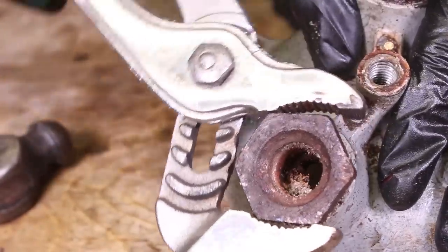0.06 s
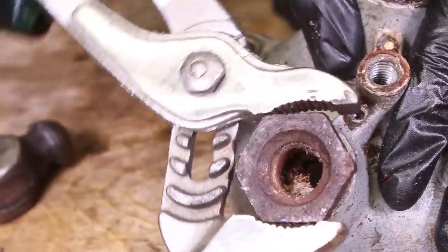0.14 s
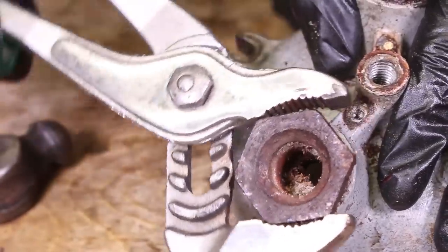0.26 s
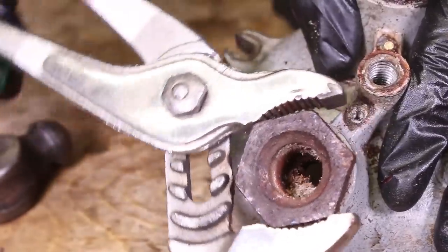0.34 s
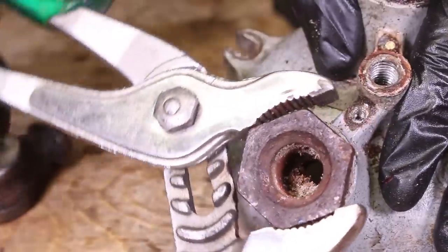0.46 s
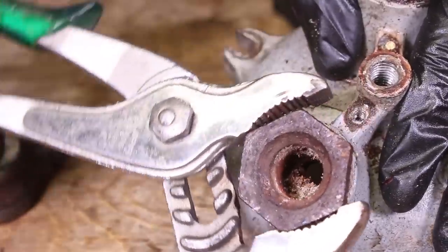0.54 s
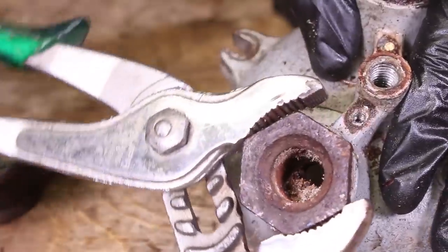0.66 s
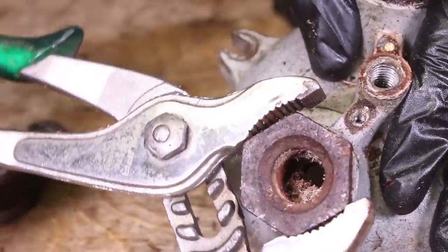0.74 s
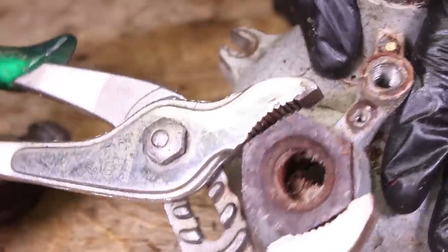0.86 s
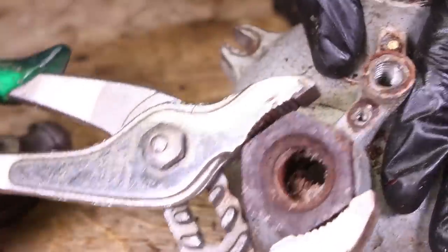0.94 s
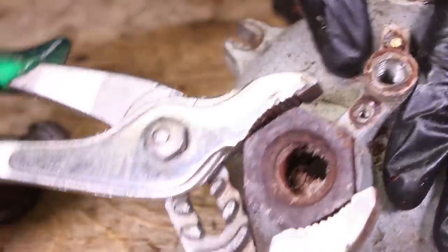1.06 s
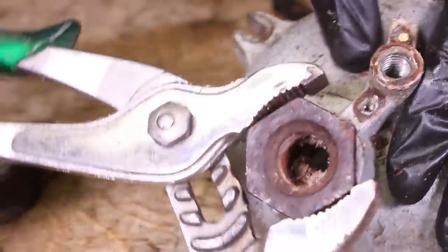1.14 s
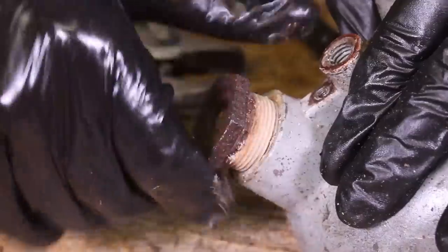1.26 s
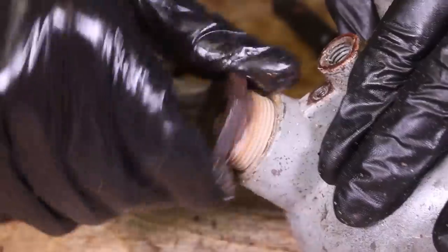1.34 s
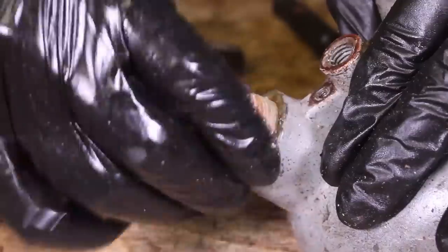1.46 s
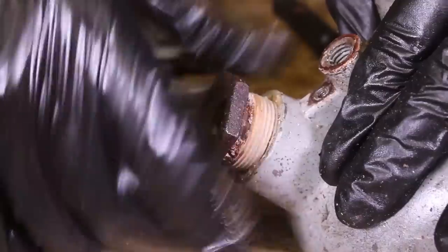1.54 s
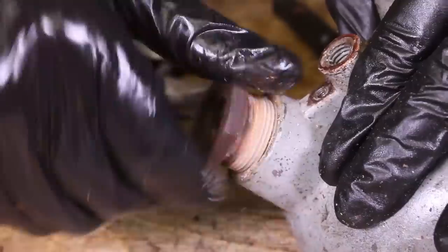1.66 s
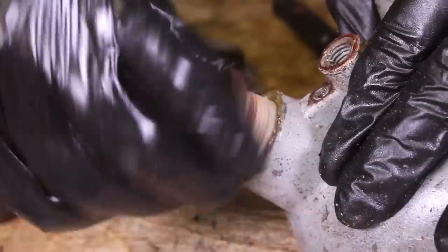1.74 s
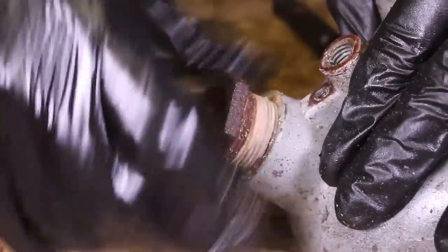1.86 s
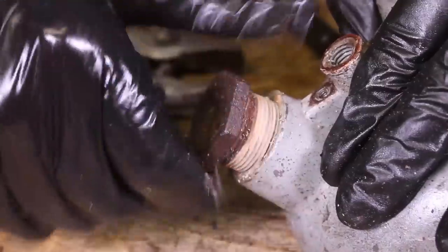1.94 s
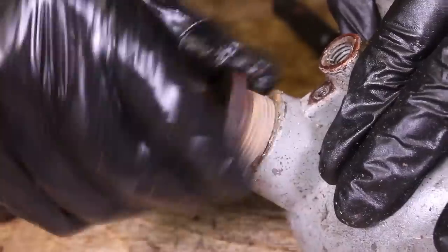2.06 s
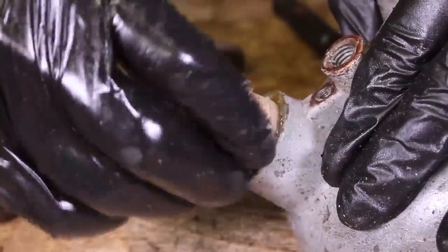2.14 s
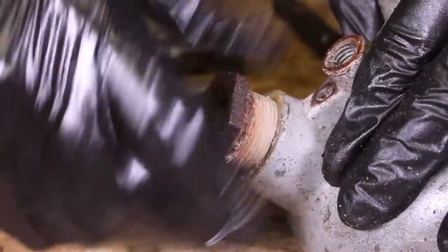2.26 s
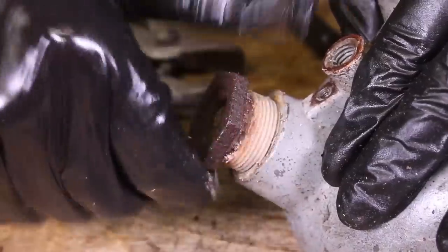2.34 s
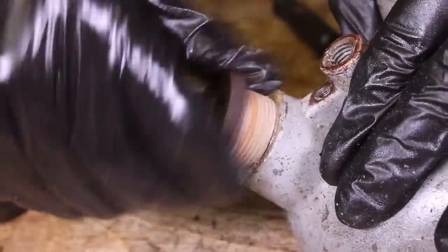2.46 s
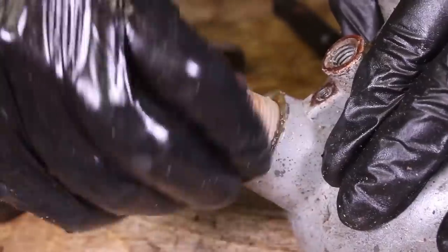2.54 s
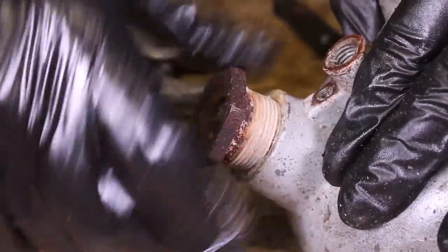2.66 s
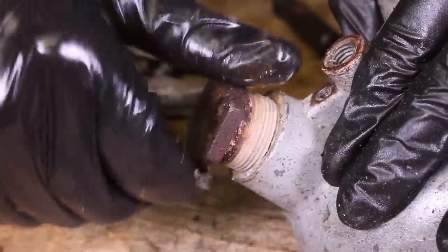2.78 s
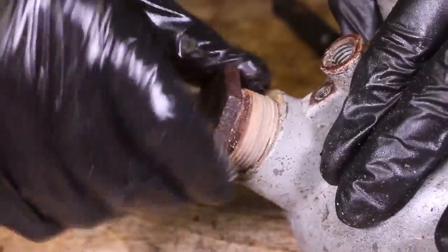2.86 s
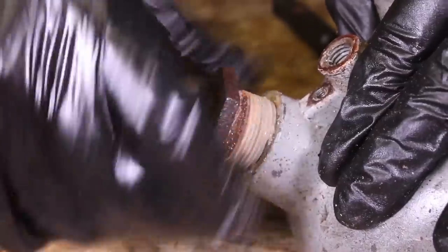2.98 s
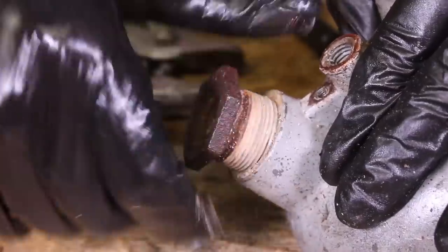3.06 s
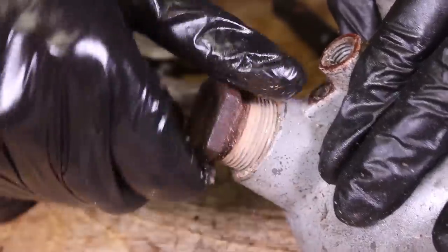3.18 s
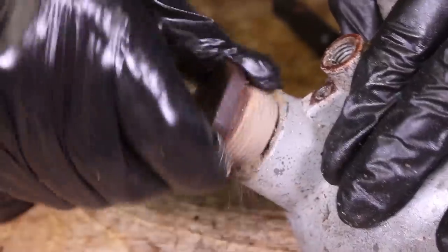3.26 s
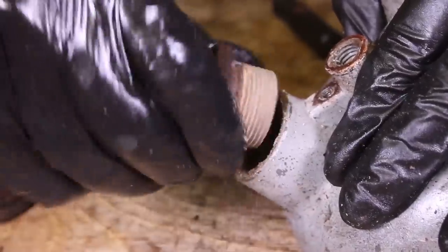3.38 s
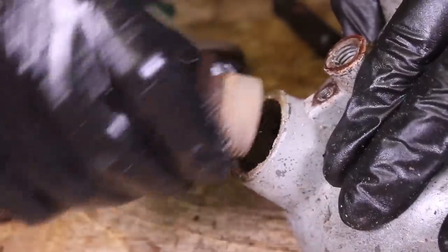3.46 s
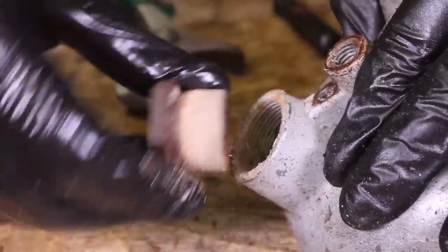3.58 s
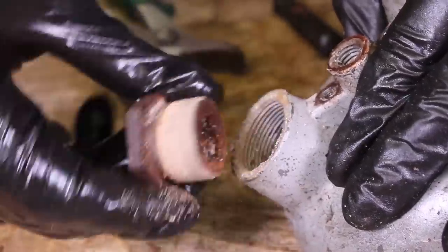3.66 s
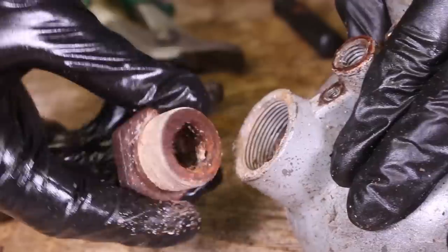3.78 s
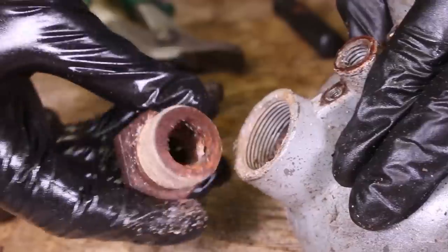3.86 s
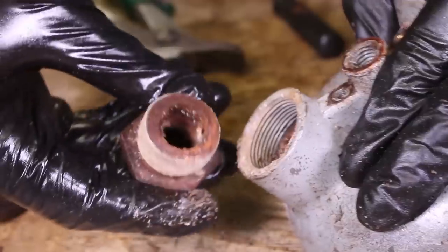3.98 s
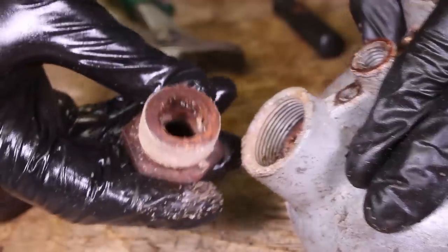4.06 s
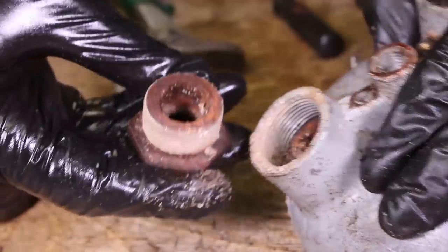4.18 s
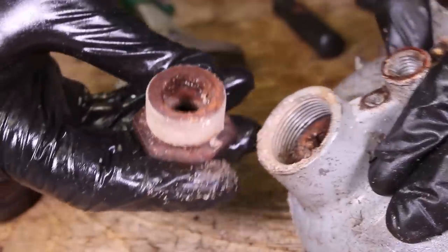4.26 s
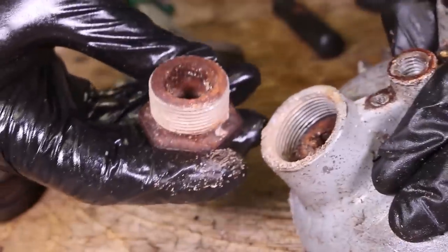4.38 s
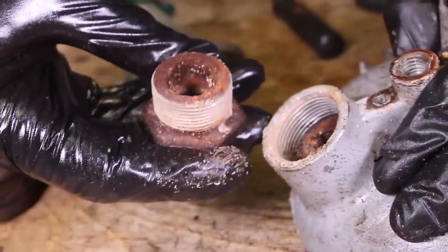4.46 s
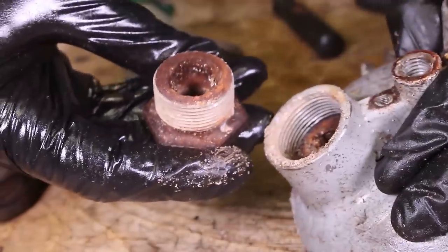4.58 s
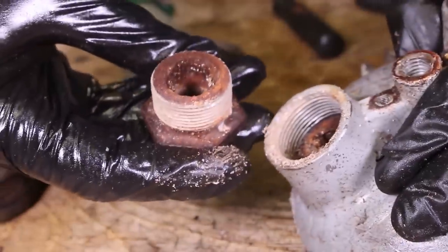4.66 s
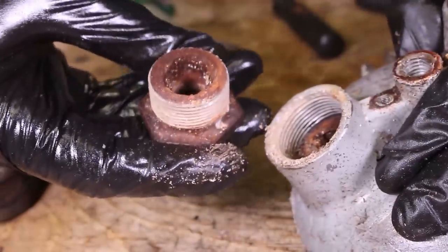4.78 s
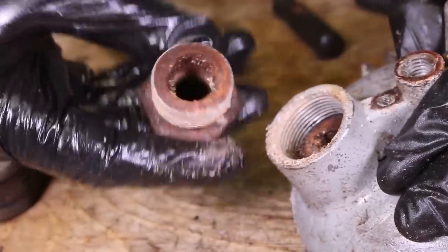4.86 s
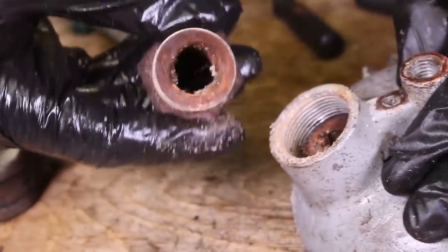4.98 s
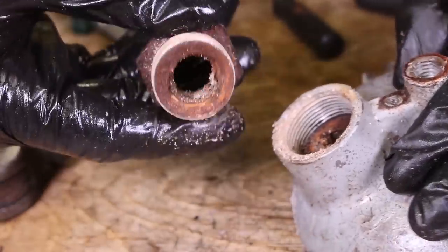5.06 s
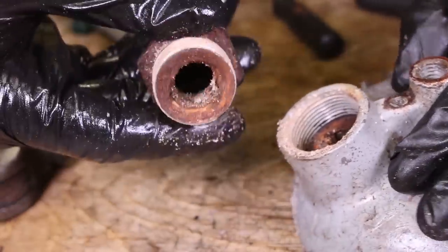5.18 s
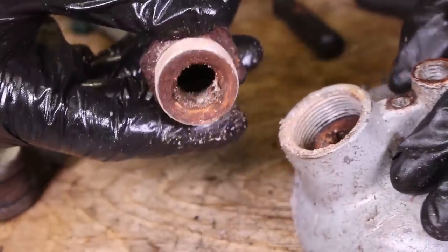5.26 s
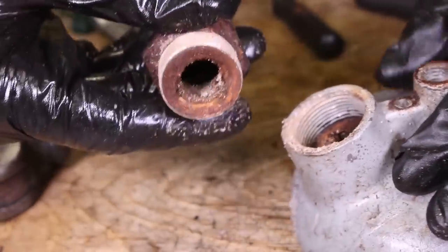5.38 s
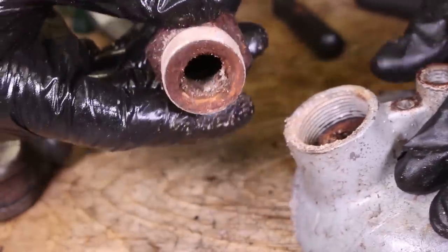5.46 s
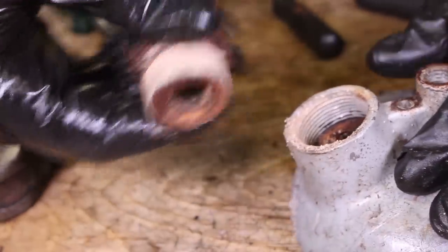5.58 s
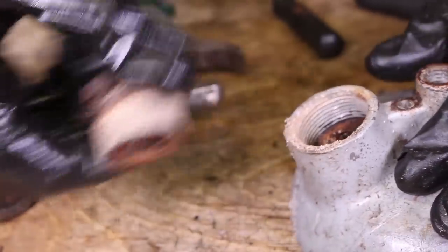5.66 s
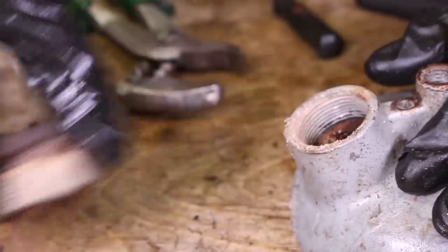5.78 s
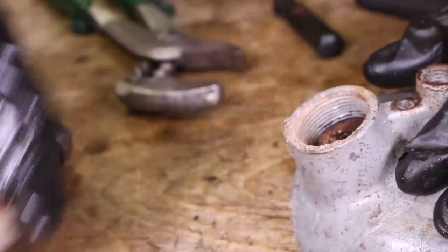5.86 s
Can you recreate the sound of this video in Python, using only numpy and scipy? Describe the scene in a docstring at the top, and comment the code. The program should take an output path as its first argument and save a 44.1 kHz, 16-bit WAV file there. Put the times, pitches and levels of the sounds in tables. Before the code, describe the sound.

One close microphone at a wooden bench in a small dry room. A seized nut creeps faintly with dull rumble, the casting bumps the wood, and rubber-gloved fingers spin the nut in short, uneven stick-slip rasps with clunks. It comes free with a hard clack. Afterwards only faint finger rustles, two small clusters of wood-and-metal taps, and a thin room hush remain.

```python
"""A rusted nut is eased by pliers in a cast lamp housing on a wooden bench, then spun out by gloved fingers in six twists.
Stick-slip grains in the thread rasp through the ringing housing and nut; short blows make the knocks of nut and housing.
Crinkling grains of noise make the rubber glove swish with the twists, between grips and under the fingertips.
Ticks, thumps and a low sway surround the work; then the freed nut is turned in the fingers
while the housing taps down on the bench. Small dry workshop, one close microphone."""
import sys
import numpy as np
from scipy import signal
from scipy.fft import rfft, irfft
from scipy.io import wavfile

SR = 44100
rng = np.random.default_rng(int(sys.argv[2]) if len(sys.argv) > 2 else 0)


def wav_out(sig):
    """Save sig, one row per channel (or a flat mono array), as 16-bit PCM at SR to the path in sys.argv[1]."""
    wavfile.write(sys.argv[1], SR, np.round(np.clip(np.atleast_2d(sig).T, -1, 1) * 32767).astype(np.int16))


N = 261072

# Levels in the tables are those going into each source's own mix trims and the room.
# twists of the nut: grip_s, fastest_s, let_go_s, rasp_db, sharp_rasp_db (relative), nut_ring_db, swish_db
NUT_TWISTS = [(1.413, 1.491, 1.568, -26.5, -6.5, -39, -42), (1.742, 1.835, 1.849, -18.5, -12, -38.5, -42.5),
              (2.078, 2.171, 2.22, -23.5, -9, -34.5, -50), (2.47, 2.555, 2.623, -23, -11.5, -35.5, -45),
              (2.887, 2.926, 2.943, -16, -9.5, -37, -55), (3.3, 3.319, 3.352, -18.5, -12.5, -28.5, -45)]
# the jaws turn the nut: time_s, thread_hiss_db, housing_groan_db
PLIERS_TURN = [(0.0, -69.5, -75), (0.25, -66, -70.5), (0.62, -71.5, -72.5), (0.9, -72, -67.5)]
# the nut knocks in its loose thread; at 1.058 s the housing cracks against the bench:
# start_s, level_db, contact_brightness_hz, grit (amplitude ratio), nut_ring_db (relative to level_db)
HOUSING_KNOCKS = [(.735, -53.5, 600, 0.36, -35), (1.0584, -27, 2640, 0.21, -46),
                  (1.393, -41.5, 1150, 0.095, -24), (1.421, -29, 2500, 0.27, -24),
                  (1.734, -22, 1650, 0.023, -30), (1.8039, -21, 1460, 0.0097, -30),
                  (1.828, -22, 1490, 0.018, -16), (2.068, -32.5, 1290, 0.32, -35),
                  (2.084, -34.5, 1300, 0.21, -35), (2.136, -26.5, 2410, .12, -14),
                  (2.155, -22.5, 2050, 0.45, -16), (2.431, -51.5, 800, 0.15, -33.5),
                  (2.4733, -19, 3200, 0.17, -12.5), (2.558, -17, 1560, 0.021, -22),
                  (2.675, -47.5, 1100, 0.13, -28), (2.705, -46, 1100, 0.11, -22),
                  (2.866, -32, 1190, 0.055, -49.5), (2.896, -20, 1200, 0.066, -29),
                  (2.910, -21.5, 2800, 0.13, -6), (2.998, -39, 898, 0.076, -24.5),
                  (3.3055, -10, 3200, 0.036, -23.5)]
# rust crumbs crack and the glove snaps: start_s, level_db, decay_s
CRUMB_TICKS = [(0.611, -60, 0.0027), (0.745, -66, 0.0054), (0.865, -48.5, 0.0074), (0.972, -45, 0.0035),
               (1.131, -49.5, 0.0036), (1.191, -45.5, 0.023), (1.685, -48.5, 0.0068), (2.343, -54, 0.0022),
               (3.222, -44.5, 0.0037), (3.247, -58.5, 0.0026), (3.671, -55.5, 0.0023),
               (5.022, -42.5, 0.0012), (5.29, -54, 0.0034), (5.379, -54, 0.0024)]
# weight lands on the bench top: start_s, level_db, contact_brightness_hz, grit (amplitude ratio)
BENCH_THUMPS = [(1.0578, -16.5, 1097, 0.02), (1.157, -37, 58.7, 0.023), (3.309, -24.5, 300, 0.022),
                (5.544, -26, 291.3, 0.022), (5.561, -37, 158, 0.0204), (5.580, -29.5, 109, 0.015)]
# casting and tools tap on the bench: start_s, wood_knock_db, metal_clink_db, contact_brightness_hz
BENCH_TAPS = [(4.026, -63.5, -63, 3000), (4.1562, -35.5, -37, 13700), (4.166, -25.5, -34.5, 4900),
              (4.175, -28.5, -34, 9730), (5.153, -56, -66.5, 5080), (5.239, -69, -67, 4130),
              (5.415, -40, -59, 5070), (5.428, -31, -46.5, 4610), (5.4563, -38, -47.5, 5000),
              (5.5054, -29, -32.5, 14100), (5.534, -36.5, -35, 12000), (5.541, -31, -42.5, 12050),
              (5.5731, -36.5, -30.5, 5300)]
# the casting drags on the bench between its taps, then lets off: time_s, level_db
HOUSING_DRAG = [(5.395, -62), (5.42, -52), (5.48, -52), (5.53, -44), (5.58, -64)]
# the load on the pliers sways the bench: time_s, level_db
PLIERS_SWAY = [(0.0, -40.5), (0.42, -38.5), (0.6, -42.5), (0.73, -30.5), (0.86, -31), (0.96, -46.5),
               (1.06, -41)]
# each push of the hands sets the bench rocking: start_s, level_db, decay_s
HAND_PUSHES = [(1.05, -24, .085), (1.394, -32, .055), (1.72, -29, .045), (2.06, -28.5, .055),
               (2.471, -30.5, .06), (2.89, -31, 0.11), (3.30, -23.5, .085), (5.541, -24, .08)]
# fingertips shift their hold on the parts: loudest_s, length_s, swish_db, dull_rub_db
FINGER_SHIFTS = [(0.75, 0.056, -57.5, -57), (0.988, 0.11, -53, -51), (1.049, 0.13, -52.5, -48.5),
                 (1.21, 0.17, -42.5, -92), (1.278, 0.096, -62, -54.5), (3.84, 0.09, -65, -72.5),
                 (4.019, 0.15, -57, -71), (4.34, 0.15, -54, -68.5), (4.471, .07, -80, -67),
                 (4.925, 0.16, -39.5, -55), (5.086, .18, -50.5, -57.5), (5.169, 0.14, -51.5, -59),
                 (5.24, 0.033, -56, -50.5), (5.363, 0.26, -64, -65), (5.772, .12, -54.5, -73.5)]
# the glove slides over the metal between grips: loudest_s, length_s, level_db, fold_pitch_hz
GLOVE_SLIDES = [(1.37, 0.13, -59, 8500), (1.602, 0.097, -53.5, 6710), (1.73, 0.14, -54.5, 8400),
                (1.925, 0.15, -61, 5510), (2.05, 0.088, -63, 8350), (2.305, 0.15, -54.5, 5470),
                (2.435, 0.042, -57.5, 7600), (2.71, 0.11, -58.5, 8950), (2.836, 0.039, -54.5, 7600),
                (2.96, 0.24, -58.5, 13100), (3.022, 0.082, -39.5, 8300), (3.245, 0.19, -59, 13070),
                (3.352, .045, -48.5, 8400), (5.08, 0.72, -63, 8550)]
# faint rustle of the glove under its strokes: time_s, level_db
GLOVE_RUSTLE = [(1.3, -71.5), (3.4, -73.5)]

# resonances of the cast housing: pitch_hz, least_width_hz, peak_db (relative)
HOUSING_MODES = [(150.8, 58, -0.5), (314, 7.3, 6.5), (338, 21, -2.5), (391, 16, -4), (430, 11, -1.5),
                 (475.7, 17, 6.5), (647.3, 84, -2.5), (687, 62, -5.5), (719, 14, -3.5), (750, 72.7, -8),
                 (870, 44, -8.5), (966, 53, -13), (1051, 71, -5), (1070, 36, -17), (1311, 40, -14),
                 (1475, 62, -11.5), (1544, 37, -12.5), (1675, 55, -11.5), (2080, 23, -23), (2450, 71, -26),
                 (2706, 130, -22)]
# resonances of the nut: pitch_hz, least_width_hz, peak_db (relative)
NUT_MODES = [(3873, 24, -1.5), (4144, 28, -11.5)]
# resonances of the bench under weight: pitch_hz, least_width_hz, peak_db (relative)
BENCH_MODES = [(63, 16, -4.5), (103.9, 10, -3.5), (146, 13, -2.5), (177.8, 26, -6.5), (298.1, 9.3, 3),
               (358, 21, 2), (412, 31, -5), (566, 20, -12.5), (742, 35, -10.5), (1020, 220, -13.5),
               (1510, 300, -33.5), (2032, 130, -18)]
# resonances of the wood under taps: pitch_hz, least_width_hz, peak_db (relative)
WOOD_MODES = [(335, 15, 0.5), (477, 78, 6), (680, 300, 3.5), (956.5, 110, -3), (1406, 89, -3.5),
              (1744, 86, -5)]
# broad resonances of the clinking metal: pitch_hz, least_width_hz, peak_db (relative)
METAL_MODES = [(1770, 540, 11), (2570, 760, 8), (3200, 350, 3), (4390, 2600, 11), (5400, 1800, -6),
               (8500, 3480, 2.5), (13400, 3000, -2)]

# colour of the hissing thread: pitch_hz, density_db (per Hz, relative)
THREAD_HISS_SPECTRUM = [(1000, 1), (2000, -1.5), (3700, -3), (4400, 7), (5200, -10), (7500, -8.5),
                        (9600, -1.5), (11500, -19), (13000, -5), (16000, -19)]
# colour of the sliding rubber: pitch_hz, density_db (per Hz, relative)
RUBBER_SPECTRUM = [(800, -13), (2000, -6), (3300, -7), (5200, 1), (6400, -6), (8500, -0.5), (10800, -9),
                   (13300, 0.5), (16000, -9)]
# colour of the fingertips' swish: pitch_hz, density_db (per Hz, relative)
FINGER_SPECTRUM = [(1200, -14.5), (2500, -6.5), (3300, -8), (4200, 1.5), (5800, 1.5), (7200, -2.5),
                   (8800, 1.5), (10500, -15), (16000, -9)]
# colour of the fingertips' dull rub: pitch_hz, density_db (per Hz, relative)
DULL_RUB_SPECTRUM = [(150, -31), (300, 4), (460, -1.5), (700, -4.5), (860, -12.5), (1010, 3.5), (1250, -17),
                     (1800, -13), (3000, -37.5)]
# colour of the room's air: pitch_hz, density_db (per Hz, relative)
AIR_SPECTRUM = [(20, 3), (60, -7.5), (105, -1.5), (150, -16), (205, -8), (330, -14.5), (600, -14),
                (1400, -24.5), (3500, -27.5), (5500, -25), (8000, -26.5), (16000, -28.5)]
# colour of the ticks: pitch_hz, density_db (per Hz, relative)
TICK_SPECTRUM = [(800, -19.5), (2200, -2.0), (3500, -9), (5000, 5), (8500, 4.5), (10800, -10.5),
                 (13500, -2.5), (16000, -13.5)]
# colour of the bench sway: pitch_hz, density_db (per Hz, relative)
SWAY_SPECTRUM = [(10, -9), (22, -9.5), (38, 3.0), (56, -4.5), (75, -19.5), (110, -32.0), (200, -49.0), (600, -83.5)]
# how long the workshop's tail lasts: pitch_hz, t60_s
ROOM_DECAY = [(100, 0.28), (400, 0.19), (1500, 0.22), (5000, 0.15), (9000, 0.31), (15000, 0.14)]

# a twist starts and lets go below its fastest speed (dB); outside it the speed falls off (dB per s)
GRIP_DB, LET_GO_DB, TAKE_HOLD_DB_PER_S, RUN_OUT_DB_PER_S = -9.5, -6.5, 1099, 332
# powers of the speed that each part follows; the glove slips a little after the nut
SHARP_POWER, RING_POWER, SWISH_POWER, SWISH_LAG_S = 2.0, 1.8, 2.6, .010
# every stroke: share of its length spent rising, fall at its ends (dB), roundness of its top
STROKE_RISE, STROKE_EDGE_DB, STROKE_ROUND = 0.43, 23, 1.35
FOLD_DB, FOLD_Q = 6.5, 3.5  # how far the glove fold's resonance stands out, and its sharpness
ROCK_RISE_S = .03
AIR_DB = -67
FIRST_ECHO_S = .003  # the tail starts here and is fully built up after twice as long
CUTOFF_HZ = 15900


def from_db(db):
    """Decibels as an amplitude."""
    return 10 ** (np.asarray(db) / 20)


def rms_one(x):
    """Level a signal to rms 1."""
    return x / np.sqrt(np.mean(x ** 2) + 1e-20)


def at_hz(points, hz):
    """Read a curve along a log-frequency axis."""
    f, value = np.transpose(points)
    return np.interp(np.log(np.maximum(hz, 1)), np.log(f), value)


def gains(rows):
    """Columns of dB as gains in time, silent outside their span."""
    s, *columns = np.transpose(rows)
    t = np.arange(N) / SR
    return np.array([from_db(np.interp(t, s, c, left=-np.inf, right=-np.inf)) for c in columns])


def coloured(x, spectrum):
    """Give a steady excitation a spectrum; rms 1."""
    size = 2 ** 18
    gain = from_db(at_hz(spectrum, np.fft.rfftfreq(size, 1 / SR)))
    return rms_one(irfft(rfft(x, size) * gain)[:N])


def filtered(x, order, hz, kind):
    """Butterworth filter: low, high or band."""
    return signal.sosfilt(signal.butter(order, hz, kind, fs=SR, output="sos"), x)


def soften(x, hz):
    """A soft contact spreads the force in time and loses the treble."""
    return filtered(x, 3, hz, "low")


def grains(per_s, spread_db):
    """Tiny slips at random moments, of uneven size; rms 1."""
    sizes = from_db(spread_db * np.clip(rng.standard_normal(N), -2, 2)) * rng.choice([-1, 1], N)
    return rms_one(sizes * (rng.random(N) < per_s / SR))


def flutter(per_s, depth_db):
    """A gain that wanders at random about 1."""
    knots = rng.standard_normal(N)
    return from_db(depth_db * np.interp(np.arange(N) * per_s / SR, np.arange(N), knots))


def ringing(modes, lowest_hz, loss=0):
    """Answer of a body to a sharp blow: a damped sine for each mode; energy 1."""
    t = np.arange(SR // 2) / SR
    hz, width, db = np.transpose(modes)[:, :, None]
    # hands and bench damp every mode; a loose contact adds its own loss
    width = np.maximum(width, np.minimum(hz / 12, 20) + loss * hz)
    decay = np.exp(-np.pi * width * t)
    out = np.sum(from_db(db) * width * decay * np.sin(2 * np.pi * hz * t), axis=0)
    out = filtered(out, 2, lowest_hz, "high")  # a small body radiates little bass
    return out / np.linalg.norm(out)


def through(x, response):
    """Drive a body's response with a continuous force."""
    return signal.oaconvolve(x, response)[:N]


def blows(rows, response, grit_s):
    """Each blow is a push with a brief crunch of grit, rung by the body; its level is that of the first 10 ms."""
    out, t = np.zeros(N + 2 * SR), np.arange(SR // 20) / SR
    for s, db, contact_hz, grit in rows:
        force = grit * rng.standard_normal(len(t)) * np.exp(-t / grit_s)
        force[0] += 1
        hit = signal.fftconvolve(soften(force, contact_hz), response)
        at = round(s * SR)
        out[at:at + len(hit)] += from_db(db) * hit / np.std(hit[:SR // 100])
    return out[:N]


def twist_speed(grip_s, fastest_s, let_go_s, lag_s=0):
    """Speed of the nut through one twist: it takes hold, speeds up to 1, slows a little and runs out."""
    t = np.arange(N) / SR - lag_s
    turning = np.interp(t, [grip_s, fastest_s, let_go_s], [GRIP_DB, 0, LET_GO_DB])
    before = TAKE_HOLD_DB_PER_S * np.maximum(grip_s - t, 0)
    after = RUN_OUT_DB_PER_S * np.maximum(t - let_go_s, 0)
    return from_db(np.maximum(turning - before - after, -200))


def gripped(x, per_s, depth_s):
    """The changing grip bends the resonances slightly up and down."""
    n = np.arange(N)
    lag = depth_s * SR * np.interp(n * per_s / SR, n, rng.standard_normal(N))
    return np.interp(n + lag, n, x)


def rusty_thread():
    """Rust sticks and slips in the thread; the uneven bursts of grains ring the housing and the nut."""
    bursts = flutter(per_s=140, depth_db=2.6)
    catches = flutter(per_s=45, depth_db=1.24)
    slips = grains(per_s=2000, spread_db=3.5) * bursts * catches
    dull = rms_one(soften(slips, hz=1460))
    sharp = rms_one(filtered(slips, 3, [1400, 2850], "band"))
    push, ring_gain = 0, 0
    for grip, fastest, let_go, rasp_db, sharp_db, ring_db, _ in NUT_TWISTS:
        speed = twist_speed(grip, fastest, let_go)
        rasp = from_db(-13.0) * speed * dull + from_db(sharp_db) * speed ** SHARP_POWER * sharp
        push = push + from_db(rasp_db) * rasp
        ring_gain = ring_gain + from_db(ring_db) * speed ** RING_POWER
    hiss, groan = gains(PLIERS_TURN)
    body = through(push + from_db(-14.0) * groan * dull, ringing(HOUSING_MODES, lowest_hz=210, loss=.012))
    for mode in NUT_MODES:
        wavering = slips * ring_gain * flutter(per_s=35, depth_db=5.5)
        body += from_db(-10.0) * through(wavering, ringing([mode], lowest_hz=4000, loss=.006))
    # a third, softer nut resonance between the other two sounds along with them in every twist
    body += from_db(-18.0) * through(slips * ring_gain, ringing([(3957, 43, 0)], lowest_hz=4340))
    body = gripped(body, per_s=44, depth_s=.00007)
    # the slow part of the push passes on into the bench
    body += from_db(-5.5) * through(soften(push, hz=120), ringing(BENCH_MODES, lowest_hz=49.3))
    return body + from_db(-2.5) * hiss * coloured(grains(per_s=4400, spread_db=6.5), THREAD_HISS_SPECTRUM)


def bench_sway():
    """The bench top rumbles under the working hands and rocks on after each push: shaped low noise."""
    sway, = gains(PLIERS_SWAY)
    for s, db, decay_s in HAND_PUSHES:
        t = np.arange(N) / SR - s
        rise = np.clip(t / ROCK_RISE_S, 0, 1)
        sway += from_db(db) * rise * np.exp(-np.maximum(t - ROCK_RISE_S, 0) / decay_s)
    return from_db(-7.0) * sway * coloured(rng.standard_normal(N), SWAY_SPECTRUM)


def room_air():
    """The air of the room is a steady, mostly low noise."""
    return from_db(AIR_DB) * coloured(rng.standard_normal(N), AIR_SPECTRUM)


def crumbs():
    """Rust crumbs and glove snaps: each tick is a short bright burst of noise."""
    t, envelope = np.arange(SR // 10) / SR, np.zeros(N)
    for s, db, decay_s in CRUMB_TICKS:
        at = round(s * SR)
        envelope[at:at + len(t)] += from_db(db) * np.exp(-t / decay_s) * (1 - np.exp(-t / 0.00065))
    return envelope * coloured(rng.standard_normal(N), TICK_SPECTRUM)


def housing_knocks():
    """The nut knocks in its thread and the housing cracks on the bench once; every blow rings housing and nut."""
    housing = ringing(HOUSING_MODES, lowest_hz=210, loss=.012)
    nut = ringing(NUT_MODES, lowest_hz=4000, loss=.006)
    housing_blows = [(s, db, hz, grit) for s, db, hz, grit, _ in HOUSING_KNOCKS]
    nut_blows = [(s, db + ring_db, 4200, grit) for s, db, _, grit, ring_db in HOUSING_KNOCKS]
    return blows(housing_blows, housing, grit_s=.003) + blows(nut_blows, nut, grit_s=0.00067)


def stroke(s, length_s):
    """A rounded swell of height 1 around its loudest moment."""
    t = np.arange(N) / SR - s
    away = np.maximum(-t / STROKE_RISE, t / (1 - STROKE_RISE)) / length_s
    return from_db(-STROKE_EDGE_DB * np.minimum(away, 10) ** STROKE_ROUND)


def fingertips():
    """Fingertips shift their hold: fine grains swish brightly while sparser catches rub dully."""
    roll, rub = sum(from_db(levels)[:, None] * stroke(s, length) for s, length, *levels in FINGER_SHIFTS)
    swish = coloured(grains(per_s=9500, spread_db=7.0), FINGER_SPECTRUM) * flutter(per_s=90, depth_db=3.0)
    catches = coloured(grains(per_s=450, spread_db=3.0), DULL_RUB_SPECTRUM)
    return from_db(-9.5) * roll * swish + from_db(-5.0) * rub * catches


def crinkled(x, per_s, depth_db):
    """Folds of rubber open and close, so each part of the treble wavers on its own; rms 1."""
    out = 0
    for k, edges in enumerate([(700, 6500), (6500, 11000), (11000, 17000)]):
        band = filtered(x, 2, edges, "band") * flutter(per_s, depth_db)
        out = out + band * (-1) ** k  # neighbouring bands have opposite polarity
    return rms_one(out)


def folded(x, hz):
    """A fold of the glove favours one part of the treble; rms 1."""
    resonance = signal.lfilter(*signal.iirpeak(hz, FOLD_Q, fs=SR), x)
    return rms_one(x + from_db(FOLD_DB) * resonance)


def rubber_glove():
    """Rubber swishes over the metal in fine, crinkling grains: with each twist and between grips."""
    rubber = crinkled(coloured(grains(per_s=6000, spread_db=4.5), RUBBER_SPECTRUM), per_s=65, depth_db=5.0)
    swish, = gains(GLOVE_RUSTLE)
    for grip, fastest, let_go, *_, swish_db in NUT_TWISTS:
        swish += from_db(swish_db) * twist_speed(grip, fastest, let_go, SWISH_LAG_S) ** SWISH_POWER
    slides = sum(from_db(db) * stroke(s, length) * folded(rubber, hz) for s, length, db, hz in GLOVE_SLIDES)
    return swish * rubber + slides


def weight_on_bench():
    """Weight landing on the bench top excites its low modes."""
    return blows(BENCH_THUMPS, ringing(BENCH_MODES, lowest_hz=53.4), grit_s=.003)


def housing_on_bench():
    """The casting taps and drags on the wood; loose metal clinks against it with hardly any ring."""
    wood = ringing(WOOD_MODES, lowest_hz=260, loss=.05)
    metal = ringing(METAL_MODES, lowest_hz=1400, loss=.12)
    drag, = gains(HOUSING_DRAG)
    slips = drag * grains(per_s=700, spread_db=2.5)
    out = through(slips, wood) + from_db(-7.0) * through(slips, metal)
    out += blows([(s, db, hz, .05) for s, db, _, hz in BENCH_TAPS], wood, grit_s=0.005)
    return out + blows([(s, db, hz, .6) for s, _, db, hz in BENCH_TAPS], metal, grit_s=0.0033)


def workshop(x, wet_db):
    """Direct sound plus a short diffuse tail that dies band by band."""
    t = np.arange(SR // 2) / SR
    tail, edges = 0, np.geomspace(60, 16000, 9)
    for low, high in zip(edges, edges[1:]):
        band = filtered(rng.standard_normal(len(t)), 2, [low, high], "band")
        tail = tail + band * 1000. ** (-t / at_hz(ROOM_DECAY, np.sqrt(low * high)))
    tail = tail * np.clip(t / FIRST_ECHO_S - 1, 0, 1)
    return x + from_db(wet_db) * through(x, tail / np.linalg.norm(tail))


def scene():
    """Work, taps and thumps each get their share of room; sway and air join dry."""
    work = rusty_thread() + crumbs() + housing_knocks() + fingertips() + rubber_glove()
    work = workshop(work, wet_db=-16.0)
    thumps = workshop(weight_on_bench(), wet_db=-13)
    taps = workshop(housing_on_bench(), wet_db=-7.0)
    return (work + thumps + taps + bench_sway() + room_air())[None]


def record(dry):
    """Peaks near full scale are rounded and the top is cut steeply."""
    rounded = dry / (1 + (dry / .95) ** 6) ** (1 / 6)
    return signal.sosfilt(signal.ellip(12, .1, 80, CUTOFF_HZ, fs=SR, output="sos"), rounded)


dry = scene()
out = record(dry)
wav_out(out)
```